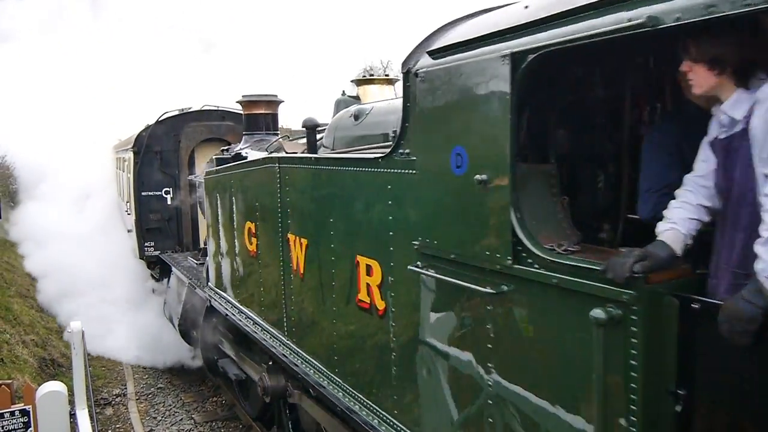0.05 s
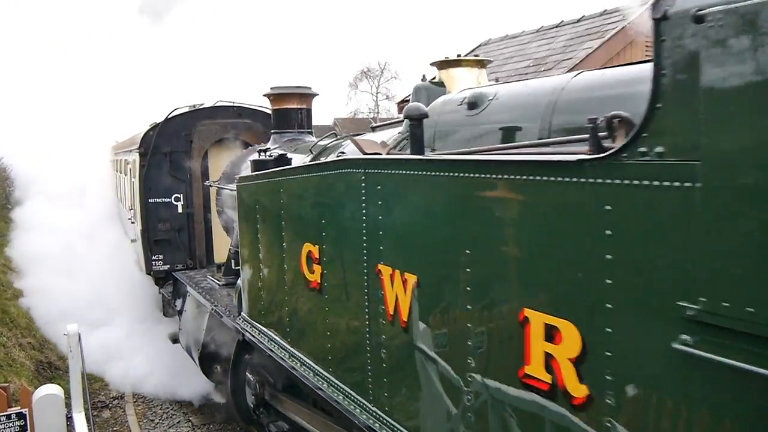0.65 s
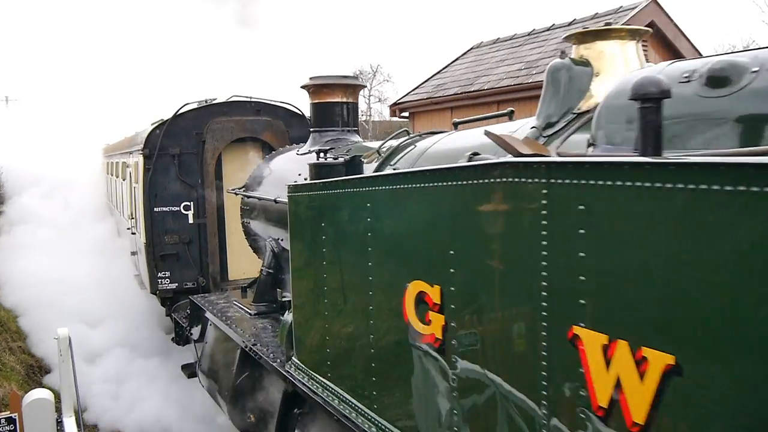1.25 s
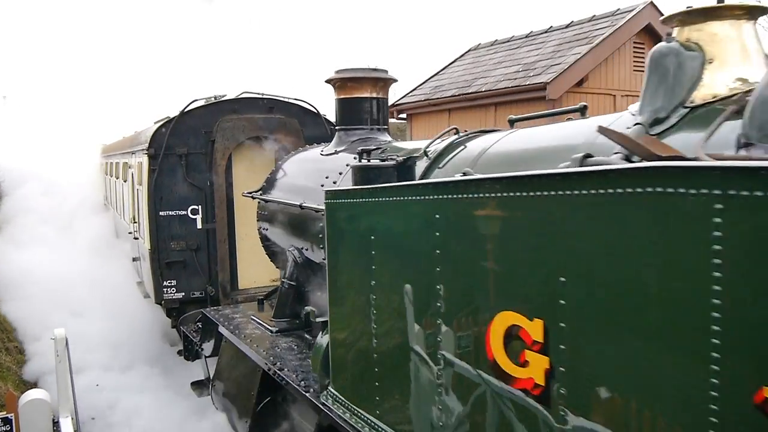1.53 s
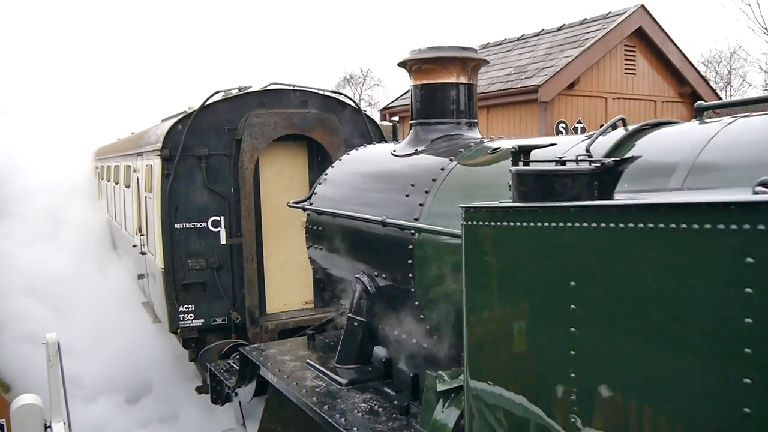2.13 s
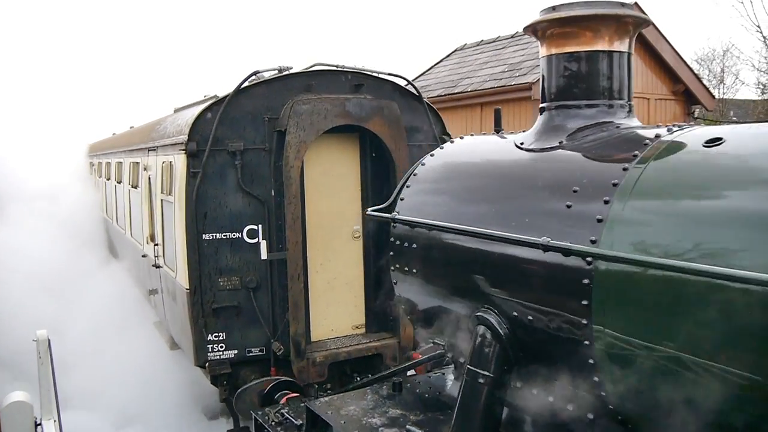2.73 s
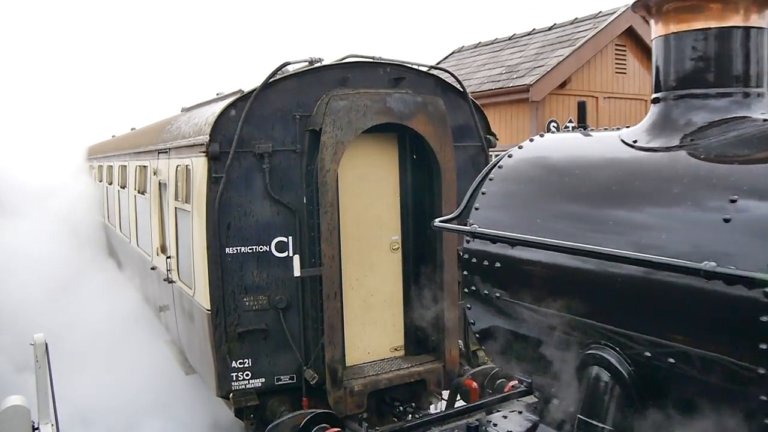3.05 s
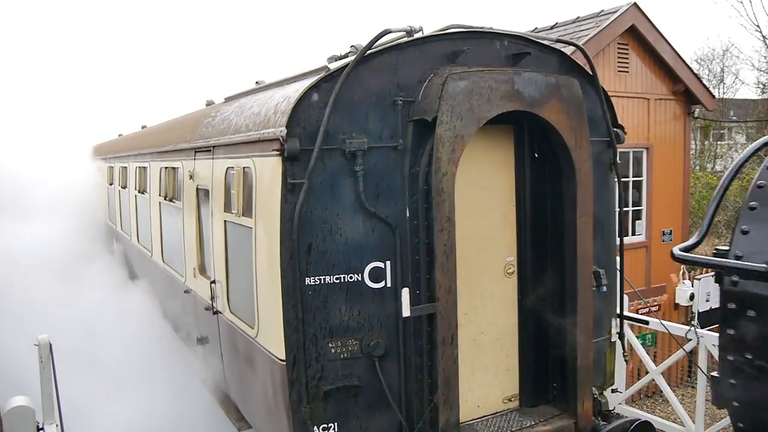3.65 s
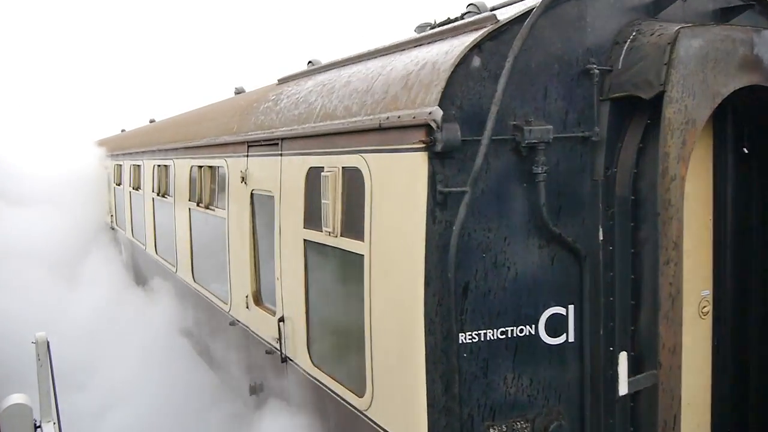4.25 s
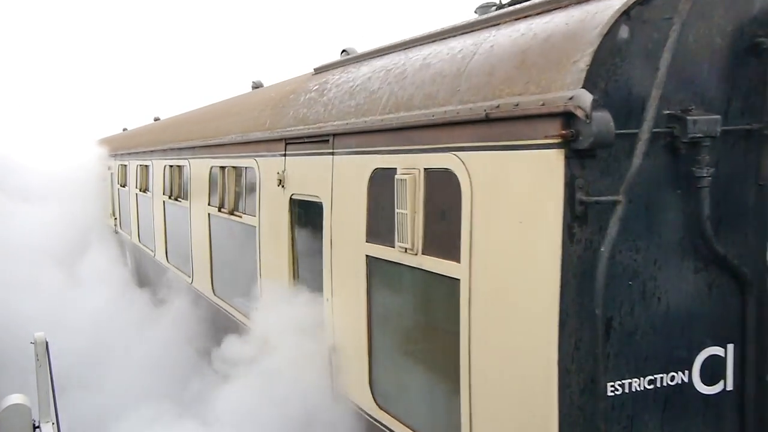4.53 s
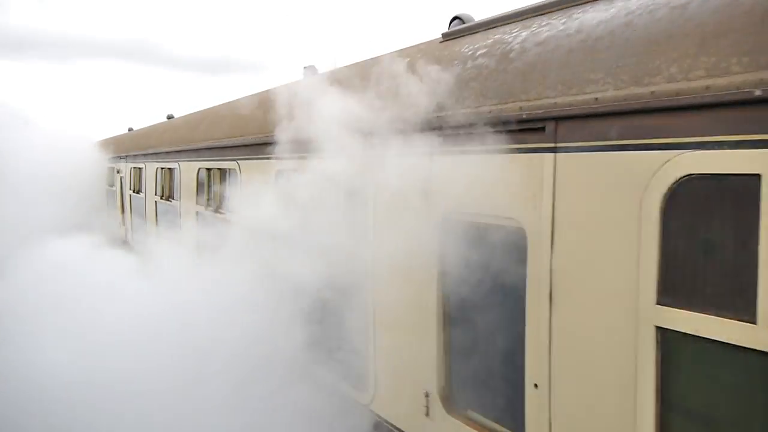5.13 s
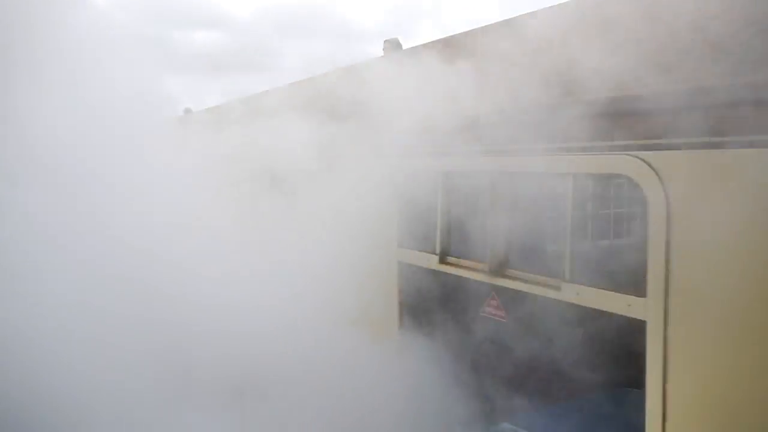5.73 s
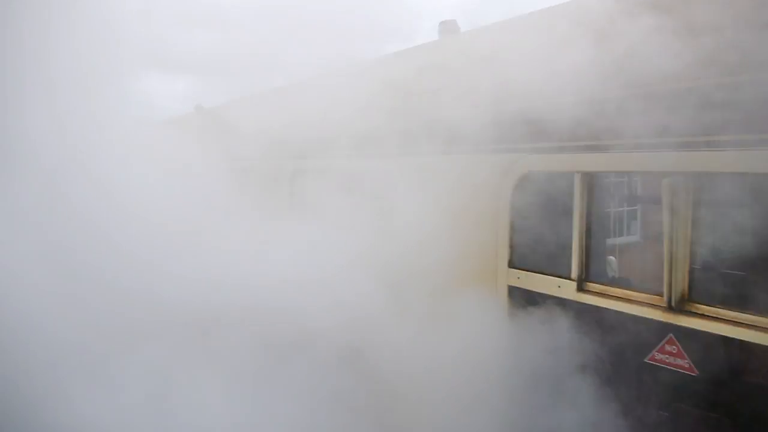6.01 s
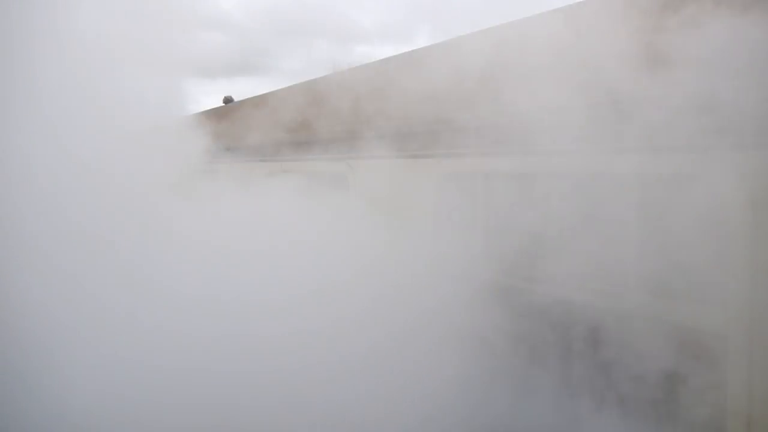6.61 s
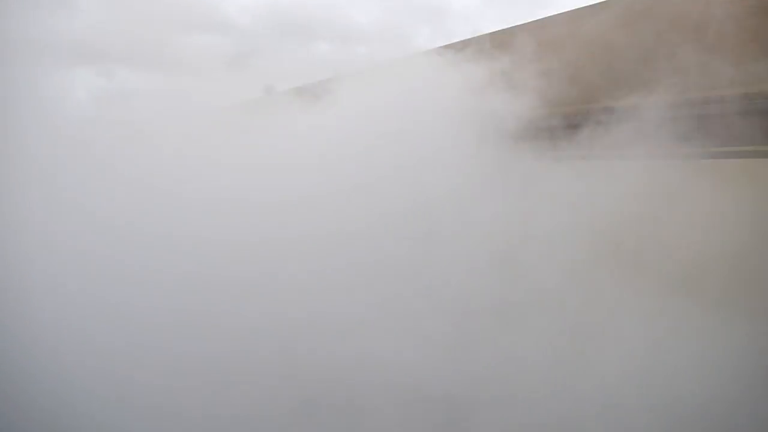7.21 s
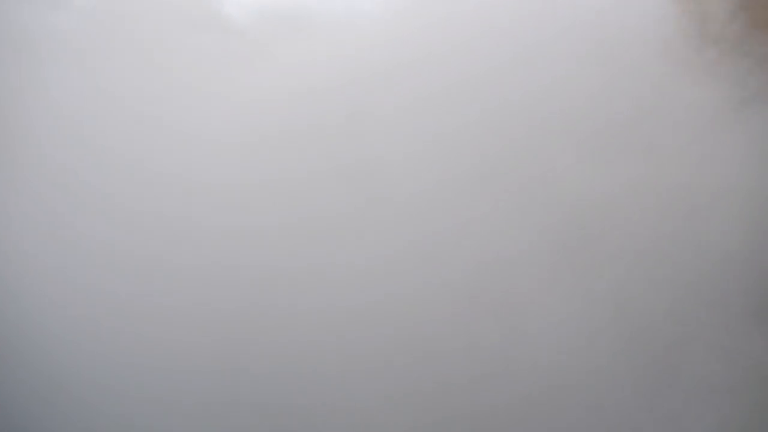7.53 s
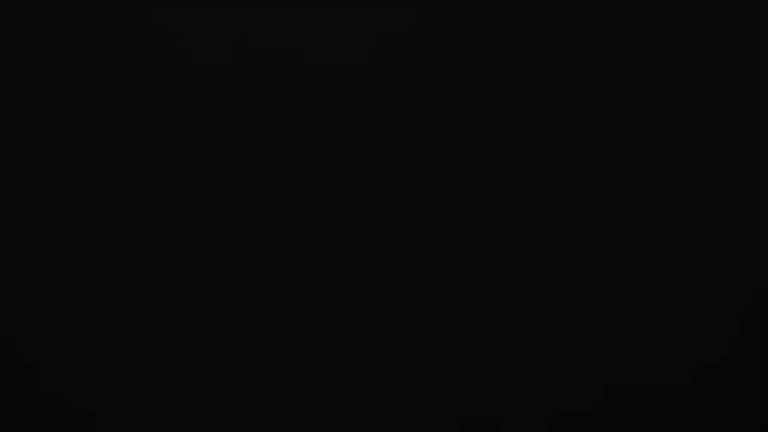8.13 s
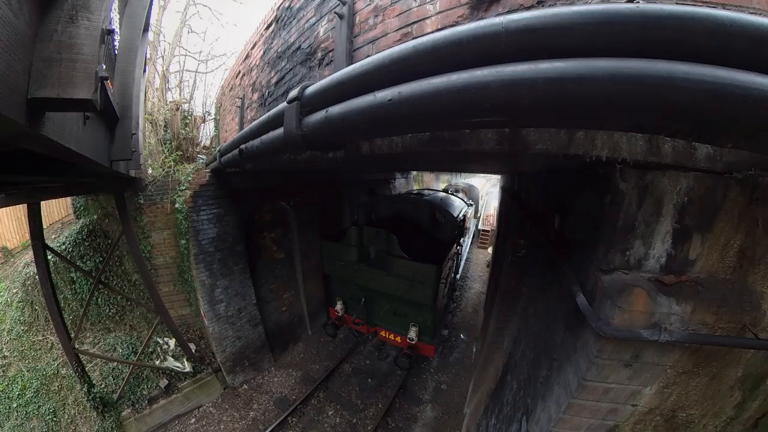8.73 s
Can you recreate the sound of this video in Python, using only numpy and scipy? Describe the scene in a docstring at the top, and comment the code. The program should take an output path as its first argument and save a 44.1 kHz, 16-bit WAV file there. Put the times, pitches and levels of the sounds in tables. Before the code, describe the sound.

A steam locomotive rolls slowly past with a carriage, heard close from the lineside in stereo. Escaping steam hisses loudly, dipping and surging gently about once a second, while a leak sings a thin, wavering high tone. Rods knock softly and wheels rumble and thump underneath. The hiss moves from straight ahead to the right, then fades in the last second into the hollow rumble of an engine under a bridge.

```python
"""Steam hisses from the open cylinder drain cocks of a tank engine rolling slowly past with a carriage, heard
from the lineside on a stereo microphone pair. Each piston stroke makes the jet slump and surge, and bends the
thin high tone of a steam leak. The steam swings from straight ahead to hard right; the jet rumbles faintly
below its hiss, the rods knock softly and the wheels thump. In the last second this fades into the hollow rumble
of an engine under a bridge."""
import sys
import numpy as np
from scipy import signal
from scipy.fft import rfft, irfft
from scipy.io import wavfile
from scipy.ndimage import uniform_filter1d

SR = 44100
rng = np.random.default_rng(int(sys.argv[2]) if len(sys.argv) > 2 else 0)


def to_wav(sig):
    """Store sig (one row per channel, or 1-D mono) as 16-bit WAV at the path in sys.argv[1].

    Samples outside -1..1 are clipped; the rate is SR.
    """
    pcm = np.clip(np.atleast_2d(sig), -1, 1) * 32767
    pcm = np.round(pcm).astype(np.int16)
    wavfile.write(sys.argv[1], SR, pcm.T)  # frames by channels


N = 390726
TIME = np.arange(N) / SR

# Base spectrum of the jet in front of the microphones: frequency_hz, level_db
JET_AHEAD = [(30, -100), (80, -89.5), (170, -79.5), (400, -73.5), (650, -68), (1000, -65), (1800, -61),
             (3200, -58), (4400, -58.5), (6300, -58), (8600, -62), (9800, -66.5), (12500, -70.5),
             (15000, -75)]
# Base spectrum of the jet once it has gone by: frequency_hz, level_db
JET_GONE_BY = [(30, -104), (80, -94), (170, -86), (550, -75.5), (1000, -69), (1400, -66), (2300, -60.5),
               (2700, -60.5), (3450, -57.5), (4100, -60), (5500, -61), (6400, -61), (9500, -71.5),
               (15000, -89.5)]
# Echo off the carriage side: time_s, first_peak_hz, echo_gain
CARRIAGE_ECHO = [(3.6, 1800, 0.028), (4.3, 2005, 0.049), (5.1, 2440, 0.047), (5.7, 2820, 0.12),
                 (6.3, 3350, 0.14), (6.6, 3460, 0.08), (7, 3470, 0.028)]
# Hollow tones of steam under the carriage: pitch_hz, width_hz, boost_db, loudest_s, half_length_s
CARRIAGE_HOLLOWS = [(740, 95, 7.5, 6.06, 0.29), (2360, 460, 4, 5.43, .5), (3460, 100, 3, 7, 0.43),
                    (5700, 620, 3, 6.44, 0.81)]
# How alike the jet is at the two microphones: frequency_hz, coherence_ahead, coherence_gone_by
MIC_COHERENCE = [(50, 0.8, 1), (1000, .93, 0.79), (2000, 0.98, 0.91), (3400, 0.94, 0.85),
                 (4800, 0.88, 0.62), (5700, 0.68, 0.75), (7100, 0.35, 0.83), (8300, 0.64, 0.48),
                 (9350, 0.22, 0.26), (10400, .48, 0.23), (13000, 0.25, .15), (15000, .25, .15)]
def steam_jet(eddy_db=0.83, ripple_db=1.68, sputter_db=0.82):
    """Turbulent hiss that loses its fizz as the nozzles turn away; eddies and water make it sputter."""
    frames = dict(nperseg=1024, noverlap=768)
    hz, t, (shared, *scattered) = signal.stft(rng.standard_normal((3, N)), SR, **frames)
    hz = hz[:, None]
    bearing, pan_db = curve(STEAM_BEARING, t)
    turned = np.clip(bearing, 0, 1) ** 2
    jet_db = (1 - turned) * colour(JET_AHEAD, hz)[0] + turned * colour(JET_GONE_BY, hz)[0]
    hiss_db, roar_db, fizz_db = jet_levels(t)
    low = hz / (hz + 150) / (1 + (hz / 1900) ** 4)
    high = 1 / (1 + (6500 / (hz + 1)) ** 4)
    jet_db += low * roar_db + (1 - low - high) * hiss_db + high * fizz_db
    # the echo's path shortens, so its comb slides upwards
    comb_hz, echo_gain = curve(CARRIAGE_ECHO, t)
    echo = echo_gain * np.exp(2j * np.pi * hz / comb_hz) / (1 + (hz / 6000) ** 4)
    jet_db += 20 * np.log10(abs(1 + echo))
    for pitch_hz, width_hz, boost_db, loudest_s, half_s in CARRIAGE_HOLLOWS:
        swell = np.exp(-((t - loudest_s) / half_s) ** 2)
        jet_db += boost_db * swell / (1 + (2 * (hz - pitch_hz) / width_hz) ** 2)
    jet_db += ripple_db * patches(jet_db.shape, bins=3, frames=90)  # many weak echoes
    jet_db += eddy_db * patches(jet_db.shape, bins=14, frames=12)
    spits = unit_rms(uniform_filter1d(rng.standard_normal(len(t)), size=4))
    jet_db += sputter_db * spits * hz / (hz + 2500)  # water lifts the whole treble
    ahead, gone_by = colour(MIC_COHERENCE, hz)
    coherence = np.clip((1 - turned) * ahead + turned * gone_by, 0, 1)
    noise = np.sqrt(coherence) * shared + np.sqrt(1 - coherence) * np.array(scattered)
    at_mics = mic_gains(hz, bearing, pan_db) * noise * amp(jet_db)
    return np.sqrt(SR / 2) * signal.istft(at_mics, **frames)[1][:, :N]


# Piston strokes: cutoff_s, pause_s, slump_db, surge_db
PISTON_STROKES = [(-.16, 0.24, -1.5, 0.8), (.94, 0.13, 3, 1.5), (2.09, 0.4, -0.2, 2.1),
                  (3.16, 0.31, 1.3, 2.2), (4.3, 0.28, 1, 0.9), (5.44, 0.3, 2, 0.1), (6.561, .27, 3.7, 0.3),
                  (7.69, .34, 0.5, -1)]
# Slow rise and fall of the jet as it passes the microphones: time_s, hiss_db, roar_db, fizz_db
PASS_BY = [(0, -1, -2.5, -1), (2.2, -.4, -0.1, 0.5), (3, -0.3, -2.5, .5), (3.8, -0.25, 2.3, 1.2),
           (5.15, 0.4, 1.5, 2.5), (5.6, -2.1, 0.2, 1.2), (6.4, -2, -1.5, -1.5), (7.28, 1.4, 3, 1.8),
           (7.6, 1.5, 0, -0.3), (8.3, -4, -2.5, -5), (8.55, -12, -37, -15), (8.86, -52, -57, -52)]
# Brief spurts of steam and water: centre_s, half_length_s, hiss_db, roar_db, fizz_db
WET_SPURTS = [(1.277, 0.14, -0.3, 4.5, 1.5), (4.555, .04, 2, 0, 4.5), (5.217, 0.058, 1.3, -0.7, 1),
              (6.093, 0.15, 4, 0.5, 1.2), (7.748, 0.027, 4, -3, 1), (8.191, 0.079, 0, -1.5, 5.5)]
def jet_levels(t, slump_s=0.11, surge_s=0.26, roar_share=0.13, fizz_share=0.95):
    """Hiss, low roar and fizz in dB: the jet slumps at cut-off and surges as steam is let in again."""
    stroke_db = sum(surge_db * hump(t - cutoff_s - pause_s, surge_s)
                    - slump_db * hump(t - cutoff_s, slump_s)
                    for cutoff_s, pause_s, slump_db, surge_db in PISTON_STROKES)
    spurt_db = sum(np.outer(bands_db, np.exp(-((t - centre_s) / half_s) ** 2))
                   for centre_s, half_s, *bands_db in WET_SPURTS)
    return np.array(curve(PASS_BY, t)) + np.outer([1, roar_share, fizz_share], stroke_db) + spurt_db


def singing_leak(scatter=0.26, fuzz_hz=150, fuzz_below_db=-35):
    """An edge tone in a steam leak: pitch follows the flow, and turbulence shakes pitch and loudness."""
    leak_db, steady_hz = leak_spells(TIME)
    pitch_hz = steady_hz + 27 * wobble(rate_hz=45) + 15 * wobble(rate_hz=7)
    core = unit_rms(1 + 0.75 * flutter(rate_hz=60))
    # when the leak barely sings, the tone loosens into a narrow hiss
    loose = 1 / (1 + amp(leak_db - fuzz_below_db) ** 2)
    shake = np.sqrt(1 - loose) * core + np.sqrt(loose) * flutter(fuzz_hz)
    tone = np.exp(2j * np.pi * np.cumsum(pitch_hz) / SR) * shake
    # echoes off the engine's side reach each microphone differently
    paths = unit_rms(1 + scatter * np.array([flutter(rate_hz=82) for _ in range(2)]))
    at_mics = tone * paths * mic_gains(steady_hz, *curve(STEAM_BEARING, TIME))
    return np.sqrt(2) * amp(leak_db) * at_mics.real


# Spells in which the leak sings: start_s, length_s, level_db, swell_s, detune_hz
LEAK_SPELLS = [(0.005, 1.0, -22.5, 0.061, 5), (1.148, 0.97, -21, 0.59, 5), (2.169, 0.12, -21.5, 0.016, 190),
               (2.34, 0.11, -23, 0.047, 160), (2.47, 0.091, -25, 0.021, 0), (2.639, 0.575, -20.5, 0.23, 10),
               (3.464, 0.047, -30, 0.033, 140), (4.05, 0.17, -26.5, 0.19, 60),
               (4.683, .83, -23.5, 0.46, -35), (5.548, 0.33, -30.5, 0.018, 70), (5.963, .58, -24, .11, -41),
               (6.58, 0.26, -30.5, .02, 90), (6.851, 0.84, -27.5, 0.28, -10.5),
               (7.72, 0.3, -25, 0.018, 50.5), (8.02, 0.43, -29.5, 0.018, -10.5)]
def leak_spells(t, empty_hz=6510, full_hz=6835, idle_db=-38, swell_db=12, release_db_per_s=260):
    """The leak's dB and pitch: spells swell, hold and die to a faint tone; pressure bends the pitch."""
    power = amp(idle_db + curve(PASS_BY, t)[0]) ** 2
    weighted_detune = np.zeros(len(t))
    for start_s, length_s, level_db, swell_s, detune_hz in LEAK_SPELLS:
        outside_s = np.maximum(start_s - t, 0) + np.maximum(t - start_s - length_s, 0)
        swell_left = np.clip(1 - (t - start_s) / swell_s, 0, 1)
        spell_power = amp(level_db - swell_db * swell_left - release_db_per_s * outside_s) ** 2
        power += spell_power
        weighted_detune += detune_hz * spell_power
    pitch_hz = empty_hz + (full_hz - empty_hz) * cylinder_pressure(t) + weighted_detune / power
    return 10 * np.log10(power), pitch_hz


def cylinder_pressure(t, empty_s=0.05, refill_s=0.18):
    """Pressure from 0 to 1: it drops at each cut-off, waits, and builds up again."""
    drops = []
    for cutoff_s, pause_s, _, _ in PISTON_STROKES:
        emptied = np.clip((t - cutoff_s) / empty_s, 0, 1)
        drops.append(emptied * np.exp(-np.maximum(t - cutoff_s - pause_s, 0) / refill_s))
    return 1 - np.max(drops, 0)


# Low knocks and thumps from wheels and rods: start_s, level_db, hardness_hz
WHEEL_AND_ROD_KNOCKS = [(0.292, -46, 129), (1.19, -37, 328), (1.237, -45, 170), (1.393, -27.5, 470),
                        (1.422, -34, 376), (3.654, -32, 420), (3.692, -37, 460), (3.828, -43, 172),
                        (5.885, -43.5, 190)]
# Ringing modes of wheel and track: pitch_hz, level_db, t60_s
TRACK_MODES = [(118, -14.5, 0.19), (183, 1, 0.17), (234, 0, 0.13), (312, 8, 0.11), (374, 10, 0.11),
               (593, 22, 0.04), (895, -4, .06)]
def wheel_and_rod_knocks(crunch=0.58, crunch_s=0.015, rise_cycles=1.8):
    """Each blow crunches and rings wheel and track; harder ones rise faster and reach higher modes."""
    out, t = np.zeros(N), np.arange(SR // 3) / SR
    for start_s, level_db, hardness_hz in WHEEL_AND_ROD_KNOCKS + rod_blows():
        ring = np.zeros(len(t))
        for pitch_hz, mode_db, t60_s in TRACK_MODES:
            envelope = amp(mode_db - 60 * t / t60_s) / (1 + (pitch_hz / hardness_hz) ** 3)
            cycles = pitch_hz * rng.uniform(0.93, 1.04) * t + rng.random()
            ring += envelope * np.sin(2 * np.pi * cycles)
        band = signal.butter(2, [80, np.clip(2 * hardness_hz, 200, 4000)], "band", fs=SR, output="sos")
        grit = unit_rms(signal.sosfilt(band, rng.standard_normal(len(t)))) * np.exp(-t / crunch_s)
        blow = (ring + crunch * grit) * (1 - np.exp(-t * hardness_hz / rise_cycles))
        slot = out[round(start_s * SR):][:len(t)]
        slot += 2 * amp(level_db) * blow[:len(slot)] / abs(blow).max()
    return out


def rod_blows(first_s=0.428, every_s=0.5605, count=14, level_db=-43, uneven_db=1.5,
              hardness_hz=180, nearest_s=2.8, fade_db_per_s=1.5):
    """Slack rods knock twice a stroke, strong and weak in turn, loudest abreast of the microphones."""
    times = first_s + every_s * np.arange(count)
    return [(s, level_db + uneven_db * (-1) ** k - fade_db_per_s * abs(s - nearest_s), hardness_hz)
            for k, s in enumerate(times)]


# Fade-in of the engine under the bridge: time_s, gain_db
BRIDGE_FADE_IN = [(7.95, -52), (8.1, -14), (8.2, -10), (8.35, -4), (8.58, 0.1), (8.85, 0.5)]
# Rumble and hiss under the arch: frequency_hz, level_db
BRIDGE_SPECTRUM = [(20, -69), (50, -67), (110, -62.5), (210, -58), (400, -66), (600, -63), (900, -59.5),
                   (1300, -70.5), (1900, -67), (2700, -70.5), (3200, -71), (4700, -66), (5900, -74.5),
                   (7100, -72.5), (9500, -109)]
# Resonances heard there: pitch_hz, width_hz, level_db
BRIDGE_RESONANCES = [(700, 43, -41), (956, 58, -42.5), (1110, 49, -42.5), (1237, 36, -42.5),
                     (1540, 50, -43.5), (2235, 110, -42.5), (2710, 70, -44), (3830, 230, -37),
                     (4370, 200, -36), (4900, 100, -41.5), (5350, 140, -47), (6400, 250, -43.5)]
# That engine's hums: pitch_hz, level_db
ENGINE_HUMS = [(36, -50), (245, -42.5), (834, -33)]
def bridge_engine(spread=0.54):
    """Rumble and dull hiss under an arch, with resonances and wavering hums; only the hiss has width."""
    hz = np.fft.rfftfreq(N, 1 / SR)
    centre, side = rfft(rng.standard_normal((2, N))) * amp(colour(BRIDGE_SPECTRUM, hz)[0])
    side_hiss = spread * irfft(side / (1 + (4500 / (hz + 1)) ** 6), N)
    noise = np.sqrt(SR / 2) * (irfft(centre, N) + np.array([side_hiss, -side_hiss]))
    rings = sum(amp(level_db) * wavering_tone(pitch_hz, flutter(width_hz / 2))
                for pitch_hz, width_hz, level_db in BRIDGE_RESONANCES)
    hums = sum(amp(level_db) * wavering_tone(pitch_hz, 1 + flutter(rate_hz=17))
               for pitch_hz, level_db in ENGINE_HUMS)
    return amp(curve(BRIDGE_FADE_IN, TIME)[0]) * (noise + rings + hums)


# Rise and fall of the jet's low rumble: time_s, gain_db
RUMBLE_LEVEL = [(0, 6.5), (1.3, 6), (2, -10), (5.5, -11), (6.8, -2), (8.2, 0.5), (8.8, -20)]
# Spectrum of the jet's low rumble: frequency_hz, level_db
RUMBLE_SPECTRUM = [(20, -97), (50, -87), (110, -88), (200, -78.5), (400, -79), (1000, -105), (4000, -140)]
def jet_rumble(lumpy_db=4, trim_db=-2):
    """Faint, lumpy low rumble from the steam jet."""
    hz = np.fft.rfftfreq(N, 1 / SR)
    spectrum = rfft(rng.standard_normal(N)) * amp(colour(RUMBLE_SPECTRUM, hz)[0])
    gain_db = curve(RUMBLE_LEVEL, TIME)[0] + lumpy_db * wobble(rate_hz=5) + trim_db
    return np.sqrt(SR / 2) * irfft(spectrum, N) * amp(gain_db)


# Where the steam is (bearing 0 is ahead, 1 hard right): time_s, bearing, treble_pan_db
STEAM_BEARING = [(.3, -0.14, -2), (1.2, 0.075, -0.8), (2.2, -0.15, -0.6), (3.8, 0.3, 1.4),
                 (4.85, 0.59, 1.2), (5.3, 0.84, 0.5), (6, 0.9, -0.5), (7.3, 1.04, 1.7)]
# The microphone pair, for a source hard right: frequency_hz, left_lead_rad, left_over_right_db
MIC_PAIR = [(30, 2, -3), (800, -0.34, -3.5), (2480, 0.3, -3.5), (4150, -0.5, 0), (4880, -1.5, 5),
            (5780, -3, -2.5), (7000, -2.5, -5.5), (9200, -3, -6.5), (11700, -2, -7.5), (15000, -10, -1.5)]
def mic_gains(hz, bearing, pan_db):
    """Complex left and right gains: sound from one side reaches the pair unequal in phase and level."""
    lead_rad, balance_db = colour(MIC_PAIR, hz)
    difference_db = balance_db * bearing + pan_db * hz / (hz + 1500)
    left = amp(difference_db / 2) * np.exp(0.5j * lead_rad * bearing)
    pair = np.array([left, 1 / left])
    return pair / np.sqrt(np.mean(abs(pair) ** 2, 0))


def amp(db):
    """Decibels to gain."""
    return 10 ** (np.asarray(db) / 20)


def unit_rms(x):
    """Scales to an rms of one."""
    return x / np.sqrt(np.mean(abs(x) ** 2) + 1e-20)


def curve(rows, t):
    """Each column of a time table, read at the times t."""
    times, *columns = np.transpose(rows)
    return [np.interp(t, times, column) for column in columns]


def colour(rows, hz):
    """Each column of a spectrum table, read on a log-frequency axis."""
    row_hz, *columns = np.transpose(rows)
    return [np.interp(np.log(hz + 1), np.log(row_hz + 1), column) for column in columns]


def flutter(rate_hz):
    """Complex noise that changes at about the given rate."""
    hz = np.fft.fftfreq(N, 1 / SR)
    white = rng.standard_normal(N) + 1j * rng.standard_normal(N)
    return unit_rms(np.fft.ifft(white / (1 + (hz / rate_hz) ** 2)))


def wobble(rate_hz):
    """Real-valued flutter with an rms of one."""
    return unit_rms(flutter(rate_hz).real)


def wavering_tone(pitch_hz, envelope):
    """A tone whose level and phase follow a complex envelope."""
    return unit_rms((envelope * np.exp(2j * np.pi * pitch_hz * TIME)).real)


def patches(shape, bins, frames):
    """A smooth random field over frequency and time."""
    field = uniform_filter1d(rng.standard_normal(shape), bins, axis=0)
    return unit_rms(uniform_filter1d(field, frames, axis=1))


def hump(t, peak_s):
    """Rises from zero at t = 0 to one at peak_s, then dies away."""
    u = np.maximum(t, 0) / peak_s
    return (u * np.exp(1 - u)) ** 2


def scene():
    """All sources at the microphone pair."""
    return steam_jet() + singing_leak() + wheel_and_rod_knocks() + jet_rumble() + bridge_engine()


# Narrow notches of the recorder: frequency_hz
RECORDER_NOTCHES = [3985, 4645, 5535]
NOTCH_WIDTH_HZ, BAND_LIMIT_HZ = 40, 15650
def record(dry):
    """The recorder cuts narrow notches in the treble and limits the band."""
    for hz in RECORDER_NOTCHES:
        dry = signal.lfilter(*signal.iirnotch(hz, hz / NOTCH_WIDTH_HZ, SR), dry)
    lowpass = signal.firwin(511, BAND_LIMIT_HZ, window=("kaiser", 9), fs=SR)
    return signal.oaconvolve(dry, lowpass[None], "same")


dry = scene()
out = record(dry)
to_wav(out)
```